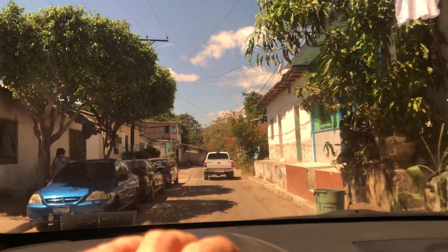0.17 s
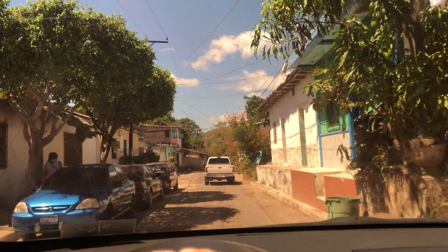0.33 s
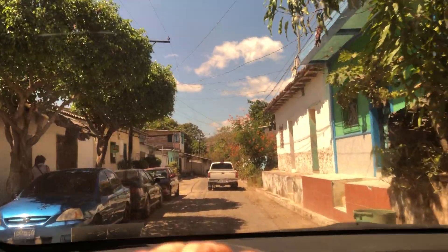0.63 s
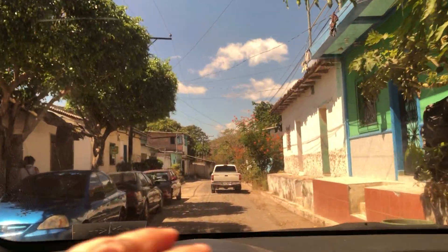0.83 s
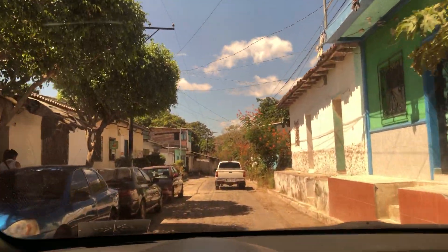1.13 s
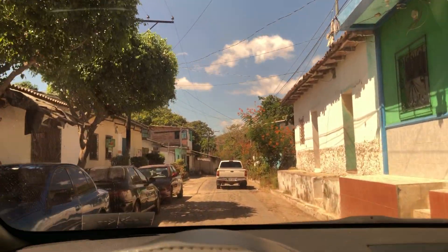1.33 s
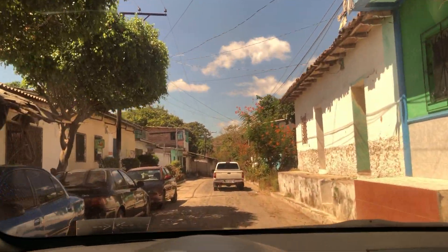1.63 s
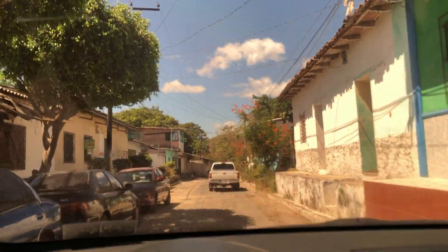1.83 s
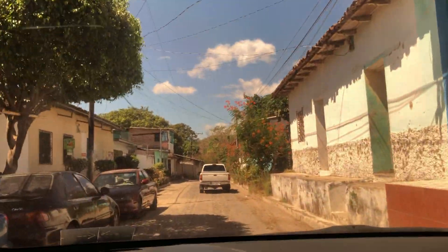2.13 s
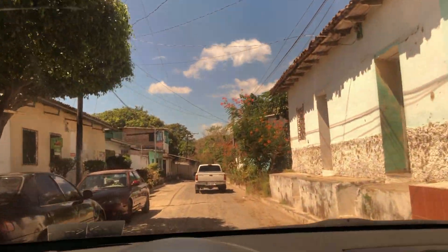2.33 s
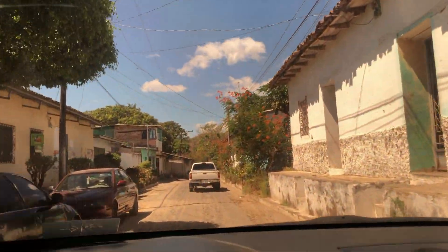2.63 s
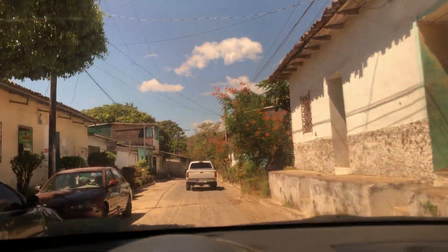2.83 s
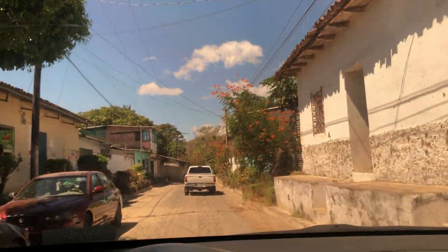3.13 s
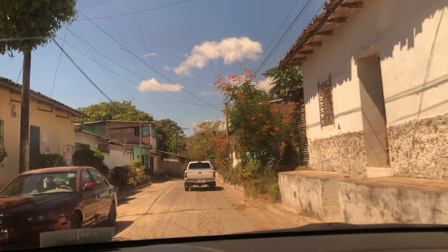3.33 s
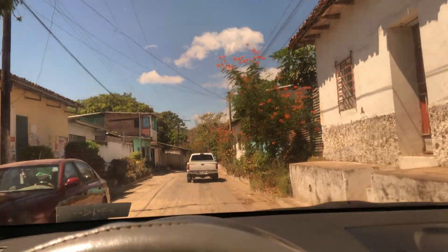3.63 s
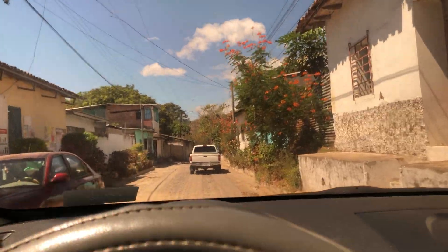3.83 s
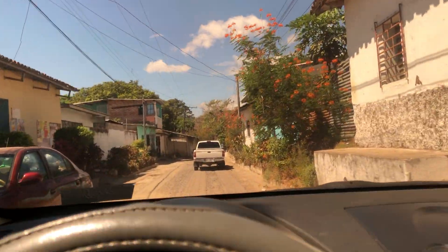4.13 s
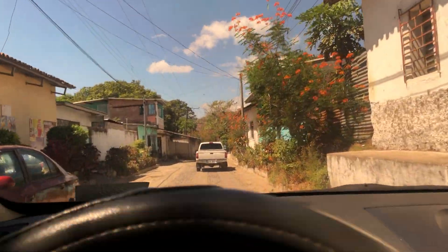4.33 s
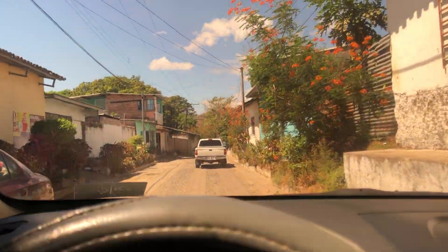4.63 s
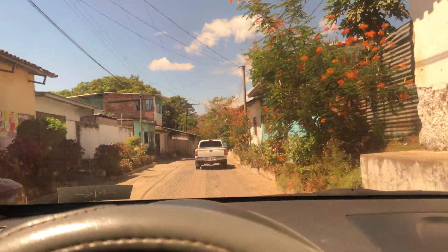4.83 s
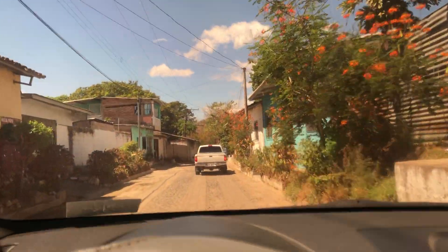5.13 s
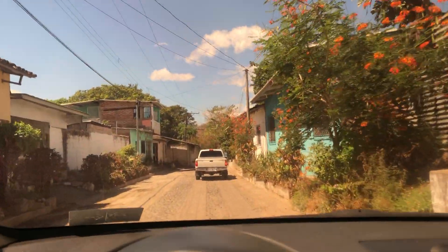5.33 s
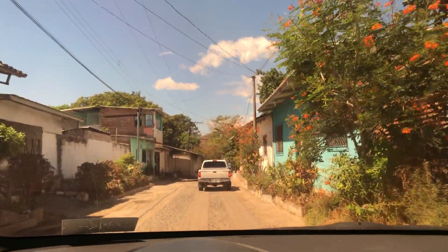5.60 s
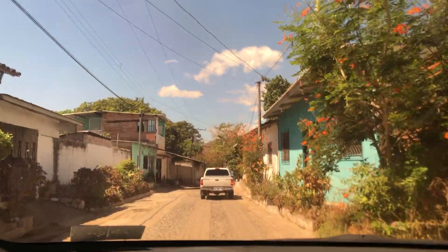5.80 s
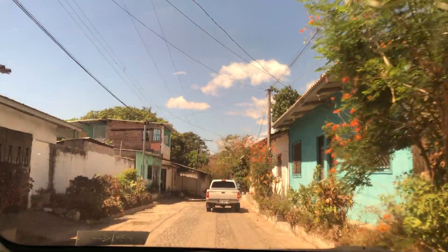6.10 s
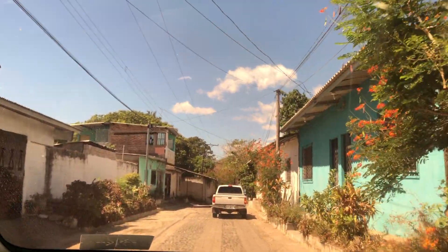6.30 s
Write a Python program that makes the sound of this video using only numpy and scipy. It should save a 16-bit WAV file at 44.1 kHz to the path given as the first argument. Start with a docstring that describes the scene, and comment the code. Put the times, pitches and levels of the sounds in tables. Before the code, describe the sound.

The cabin of a car rolling slowly over rough cobbles, heard from inside and already moving at the start. Throughout, a dominant deep rumble wavers and lurches, made of body shake, hollow cabin boom and dull floor drumming. Beneath it are muffled tyre roar, fine grit taps and a very faint airy hiss. From 0 to 0.7 s the ride is busiest, with tight thuds, rattling trim, bright ticks and a slight rustle. Knocks cluster again near 1.1 s and 1.9 s; heavier booms land around 2.2 to 2.4 s. About 3 to 3.5 s is calmer, with fewer rattles. Dry trim knocks gather at 3.8 to 3.95 s and 4.6 s. A crisp click and crinkle come near 5 s, a strong boom at 5.1 s, then lively rattling from 5.5 to 5.8 s and another thud near 5.6 s. Scattered knocks and ticks continue over the rumble until 6.4 s.

```python
"""Stones boom and shudder through the cabin of a car rolling slowly over cobbles, heard from inside at one microphone.
A random patter and single thuds ring the body, cabin air, tyre cavities and floor; shaped noise makes
the tyre roar, the air from the vents and the hiss above it, and grit taps under the tread.
Close by, loose trim knocks with ringing panel modes, bursts of noise click, and grainy treble rustles."""
import sys
import numpy as np
from scipy import signal
from scipy.fft import rfft, irfft, next_fast_len
from scipy.io import wavfile
from scipy.ndimage import uniform_filter1d, map_coordinates

SR = 44100
rng = np.random.default_rng(int(sys.argv[2]) if len(sys.argv) > 2 else 0)


def log_audio(samples):
    """Write samples as a 16-bit WAV file to the path given in sys.argv[1]."""
    # one column per channel
    frames = np.atleast_2d(samples).T
    # limit to full scale, then quantise
    limited = np.clip(frames, -1, 1)
    pcm = np.round(limited * 32767).astype(np.int16)
    wavfile.write(sys.argv[1], SR, pcm)


N = 284886  # length in samples

# Air noise along the road. Each row: time in seconds, tyre roar in dB, vent rush in dB, hiss in dB.
AIR_LEVELS = [(0.0, -42.5, -60.5, -63), (0.07, -52, -68, -69.5), (0.2, -47, -62.5, -65.5),
              (0.41, -46.5, -65.5, -67), (0.59, -49.5, -64.5, -65.5), (0.8, -50.5, -67, -67.5),
              (1.51, -52.5, -68.5, -70.5), (1.75, -51, -67.5, -69.5), (1.9, -47, -66, -64.5),
              (1.99, -52, -69.5, -72.5), (2.07, -48.5, -68.5, -68.5), (2.33, -50.5, -66, -67.5),
              (2.64, -49.5, -67.5, -69.5), (2.99, -50, -66, -67), (3.24, -51.5, -67, -70.5),
              (3.45, -50, -66, -67), (3.6, -51, -67, -69.5), (3.74, -50, -65.5, -69.5),
              (4.04, -51, -68, -70), (4.3, -50, -68, -68.5), (4.53, -49.5, -66.5, -69),
              (5.24, -51, -67.5, -69), (5.6, -50, -65, -67.5), (5.92, -50.5, -68, -70.5),
              (6.4, -50, -69.5, -71)]
# Resonances of the trim panels. Each row: pitch in Hz, relative level in dB.
PANEL_MODES = [(535, -1), (690, -1.5), (790, -5.5), (880, -3.5), (970, -5), (1090, -6), (1220, -7.5),
               (1430, -11.5), (1650, -9.5), (1790, -8), (1970, -21), (2300, -20), (2500, -19.5),
               (2850, -18), (3200, -20), (3480, -19.5), (3820, -18), (4200, -23), (4520, -26), (5700, -24),
               (6300, -29)]


def amp(db):
    """Decibels to gain."""
    return 10 ** (np.asarray(db) / 20)


def unit(x):
    """Scaled to rms 1."""
    return x / np.sqrt(np.mean(x ** 2) + 1e-20)


def curves(rows):
    """One value per sample for each column after the time."""
    s, *cols = np.transpose(rows)
    return [np.interp(np.arange(N) / SR, s, c) for c in cols]


def wobble(rate):
    """A smooth random curve, rate knots a second."""
    knots = rng.standard_normal(int(N * rate / SR) + 4)
    return map_coordinates(knots, [np.arange(N) * rate / SR])


def filtered(x, response):
    """x times a response of frequency, real or complex."""
    m = next_fast_len(len(x) + 8192)
    return irfft(rfft(x, m) * response(np.fft.rfftfreq(m, 1 / SR)), m)[:len(x)]


def modes(table):
    """Causal response of (Hz, width Hz, dB) resonances, neighbours in opposite phase."""
    def response(f):
        total = 0
        for k, (centre, width, db) in enumerate(table):
            damping = 1j * f * width
            total = total + (-1) ** k * amp(db) * damping / (centre * centre - f * f + damping)
        return total
    return response


def rush(spectrum, patchy_db):
    """Noise of rms 1 coloured by (Hz, dB per Hz) points, with random gain in patches of time and pitch."""
    z = signal.stft(rng.standard_normal(N + 512), nperseg=256)[2]
    field = uniform_filter1d(rng.standard_normal(z.shape), 6, 0)  # smooth across pitch
    field = uniform_filter1d(field, 8, 1)  # smooth across time
    x = signal.istft(z * amp(patchy_db * unit(field)), nperseg=256)[1][:N]
    hz, db = np.transpose(spectrum)
    return unit(filtered(x, lambda f: amp(np.interp(np.log(f + 1), np.log(hz), db, -120, -120))))


def steady(x, span):
    """x with its level evened out over span seconds."""
    power = uniform_filter1d(x ** 2, int(span * SR))
    return x / np.sqrt(np.abs(power) + 1e-9)


def taps(rows, sharp, snap):
    """Rows (s, peak dB, Hz, burst t60 s): dying noise rings a resonance of Q sharp, passed twice."""
    out, t = np.zeros(N + SR), np.arange(2048) / SR
    for s, db, hz, t60 in rows:
        onset = 1 - 0.56 * np.exp(-t / 0.0032)
        burst = rng.standard_normal(len(t)) * amp(-60 * t / t60) * onset
        burst[:3] += snap * np.array([1, 2, 1])  # the first contact
        peak = signal.iirpeak(hz, sharp, SR)
        ring = signal.lfilter(*peak, signal.lfilter(*peak, burst))
        out[round(s * SR):][:len(t)] += amp(db) * ring / np.abs(ring).max()
    return out[:N]


def scatter(count, top_db, spread_db, hz, octaves, t60):
    """Rows of random small taps: exponential drops below top_db, spread_db on average, hz +- octaves."""
    when, strength, pitch = rng.random((count, 3)).T
    level_db = top_db + spread_db * np.log(strength + 1e-9)
    pitch_hz = hz * 2 ** (octaves * (2 * pitch - 1))
    return np.c_[when * N / SR, level_db, pitch_hz, np.full(count, t60)]


def cobbles():
    """Random stone blows ring four parts of the car; a big stone swings one mode and quiets its part's patter."""
    # Patter of small stones before its random swings. Each row: time in seconds, body shake in dB,
    # cabin boom in dB, tyre cavity in dB, floor drumming in dB.
    patter_levels = [(0.0, -34, -30.5, -43.5, -46), (0.4, -30.5, -32, -41, -47.5),
                     (0.83, -37.5, -32, -42, -46), (1.64, -34.5, -33, -41.5, -50.5),
                     (2.05, -32.5, -31.5, -39.5, -49), (2.28, -36.5, -30.5, -41.5, -49),
                     (3.35, -35.5, -34, -44.5, -53), (3.72, -40, -36, -50.5, -48),
                     (4.06, -41, -34, -49.5, -55.5), (4.39, -35, -35, -41, -51.5),
                     (4.64, -38, -34, -45.5, -50), (5.24, -38, -32, -44, -50), (5.4, -36, -33, -42, -48),
                     (5.63, -33.5, -34.5, -48.5, -48), (6.08, -36.5, -35.5, -47, -50),
                     (6.46, -34.5, -32.5, -42, -51.5)]
    # Modes of body shake, cabin air, tyre air cavity and floor panel.
    # Each row: pitch in Hz, width in Hz, relative level in dB.
    body_modes = [(38.6, 4.4, -5.5), (46, 15, 0), (61.87, 48.6, -1.5)]
    cabin_modes = [(85.56, 22.8, -5), (113.7, 12.5, -1), (130.1, 19, 0), (149.07, 42.2, -8.5)]
    cavity_modes = [(170.4, 40.8, -3.5), (187.1, 28.7, 0), (208.4, 27, -7.5)]
    floor_modes = [(240.5, 63, 0.5), (308.3, 16.7, 3), (354, 29, 1), (440, 74, -16)]
    # Big stones under a wheel. Each row: middle in seconds, rms level at the middle in dB, thud pitch in Hz.
    big_stones = [(0.055, -37, 242), (0.056, -34, 161), (0.065, -39, 361), (0.12, -30, 115.7),
                  (0.17, -38, 44), (0.233, -24, 114.3), (0.267, -32.5, 180), (0.29, -35, 275),
                  (0.294, -34, 334), (0.324, -33, 92), (0.347, -36.5, 321), (0.389, -28, 61),
                  (0.405, -28.5, 171), (0.417, -34.5, 298), (0.484, -30.5, 192.4), (0.485, -29.5, 72),
                  (0.569, -39, 300), (0.683, -30.5, 121), (0.74, -28.5, 81), (0.878, -31.5, 181),
                  (0.899, -27.5, 107.6), (0.908, -37, 288), (0.863, -28, 70), (0.943, -47, 323),
                  (1.034, -31.5, 85.8), (1.043, -28, 124), (1.054, -37.5, 320), (1.083, -28, 181),
                  (1.107, -44, 248), (1.127, -29.5, 129), (1.168, -39.5, 345), (1.207, -41, 307),
                  (1.257, -28, 107.5), (1.322, -41, 253), (1.372, -41, 205), (1.392, -40, 334),
                  (1.393, -30.5, 54), (1.397, -27.5, 95), (1.506, -33, 188), (1.56, -38, 210),
                  (1.613, -33.5, 101), (1.648, -35.5, 181), (1.716, -33.5, 178), (1.742, -33.5, 44),
                  (1.806, -32.5, 178), (1.811, -33.5, 75), (1.846, -39, 385), (1.873, -26.5, 113.7),
                  (1.931, -29.5, 86), (1.936, -40, 312), (1.94, -26, 174), (1.999, -34.5, 168.8),
                  (2.055, -36, 210), (2.062, -25, 129), (2.11, -34, 178), (2.143, -38, 228),
                  (2.207, -27.5, 173), (2.211, -22.5, 96.5), (2.215, -43.5, 385), (2.251, -29.5, 55),
                  (2.26, -44, 291), (2.275, -26.5, 97), (2.359, -27.5, 75), (2.37, -35.5, 240),
                  (2.375, -40, 345), (2.372, -21.5, 120.1), (2.401, -37.5, 288), (2.459, -35, 39),
                  (2.532, -28.5, 112.8), (2.648, -26.5, 108.5), (2.71, -36, 68), (2.841, -28.5, 135.7),
                  (2.873, -28.5, 75), (2.966, -28, 142), (2.989, -40, 226), (3.048, -38, 205),
                  (3.053, -39, 39), (3.092, -30, 145), (3.153, -34, 43), (3.289, -42.5, 256),
                  (3.332, -39, 210), (3.401, -39, 323), (3.417, -38, 205), (3.527, -39.5, 291),
                  (3.575, -31, 45), (3.6, -29.5, 110.3), (3.662, -32.5, 65), (3.956, -34.5, 182),
                  (3.961, -43, 350), (4.04, -32.5, 124), (4.205, -28.5, 87), (4.23, -33, 44),
                  (4.42, -42, 291), (4.45, -31.5, 135.1), (4.455, -31.5, 175), (4.613, -28.5, 120),
                  (4.675, -27.5, 180), (4.863, -31.5, 54.4), (4.991, -29, 90.1), (5.11, -23.5, 121),
                  (5.162, -28, 136), (5.203, -37, 39), (5.249, -33, 170), (5.308, -45, 242),
                  (5.378, -30, 51.1), (5.418, -37, 204), (5.463, -31, 81), (5.5, -33, 40),
                  (5.527, -47, 301), (5.624, -36, 323), (5.635, -24, 114.3), (5.672, -43, 285),
                  (5.862, -42, 307), (5.867, -34, 178), (5.897, -30, 65.7), (5.99, -31.5, 129.5),
                  (6.041, -40.5, 366), (6.106, -40, 345), (6.151, -27, 127.2), (6.156, -32.5, 192),
                  (6.282, -43, 253)]
    # Brief let-ups of the patter. Each row: middle in seconds, depth from 0 to 1 (held to 0.95),
    # pitch in Hz that picks the nearest part to quiet.
    let_ups = [(0.131, 0.8, 190), (0.155, 0.4, 110), (0.684, 0.5, 50), (0.752, .7, 190), (1.009, 0.9, 190),
               (1.289, 0.9, 110), (1.474, 0.35, 110), (1.541, 0.8, 110), (1.748, 0.8, 109), (2.015, .6, 50),
               (2.027, 0.8, 110), (2.461, 0.8, 190), (2.593, 0.8, 110), (2.649, 0.5, 50), (2.708, .7, 190),
               (3.134, 0.4, 110), (3.338, 0.64, 110), (3.741, 0.6, 110), (3.768, 0.6, 190),
               (3.908, .7, 190), (3.982, .7, 50), (4.09, .7, 190), (4.096, 0.7, 110), (4.49, .6, 110),
               (4.621, 0.6, 50), (4.729, 0.3, 110), (4.873, 0.9, 110), (4.922, 0.6, 190), (5.048, 0.4, 50),
               (5.065, 0.6, 110), (5.491, .7, 190), (5.499, .7, 110), (5.584, 1, 110), (5.66, .7, 190),
               (5.721, 0.8, 50), (5.804, 1, 110), (6.022, 0.7, 110), (6.406, 0.9, 110)]
    bump_cycles, lull_cycles = 1.97, 1.57  # time from the middle to 1/e, in cycles of the row's pitch
    lurch_db, lurch_cycles = 2.5, 4.5  # random swings of the patter, cycles between knots

    t = np.arange(N) / SR
    parts = (body_modes, cabin_modes, cavity_modes, floor_modes)
    centres_hz = np.array([np.sqrt(table[0][0] * table[-1][0]) for table in parts])

    def nearest_part(hz):
        """Index of the part whose centre lies nearest in pitch."""
        return np.argmin(np.abs(np.log(hz / centres_hz)))

    thuds, unload = np.zeros(N), np.ones((len(parts), N))
    for (s, db, hz), turn in zip(big_stones, rng.random(len(big_stones))):
        near = slice(max(round((s - .15) * SR), 0), round((s + .15) * SR))
        swell = np.exp(-((t[near] - s) * hz / bump_cycles) ** 2)
        swing = np.sin(2 * np.pi * (hz * t[near] + turn))
        thuds[near] += np.sqrt(2) * amp(db) * swell * swing
        unload[nearest_part(hz), near] *= 1 - 0.41 * swell
    for s, depth, hz in let_ups:
        dip = np.exp(-((t - s) * hz / lull_cycles) ** 2)
        unload[nearest_part(hz)] *= 1 - min(depth, .95) * dip

    out = thuds
    for level_db, table, centre_hz, rest in zip(curves(patter_levels), parts, centres_hz, unload):
        blows = rng.standard_normal(N) * (rng.random(N) < 400 / SR)  # about 400 a second
        broad = modes([(centre_hz, 1.6 * table[0][0], 0)])  # steepens the skirts
        ring = filtered(blows, lambda f: modes(table)(f) * broad(f))
        even_s = 4 / table[0][0]  # springs and dampers even out the blows over a few cycles
        swing_db = lurch_db * wobble(centre_hz / lurch_cycles)
        out = out + rest * amp(level_db + swing_db) * steady(ring, even_s)
    return out


def tyres_and_vents():
    """Tyre roar, vent rush, hiss and topmost air: coloured noise whose levels share one random flutter."""
    # Colours of the noises. Each row: frequency in Hz, relative density in dB per Hz.
    roar_colour = [(240, -10), (400, 1), (490, -2.5), (580, -7), (720, -1), (915, 0.5), (1150, -5),
                   (1280, -4.5), (1740, -12), (2140, -21.5), (2300, -49), (2990, -71), (5060, -120)]
    vent_colour = [(1700, -33), (2180, -10), (2400, -0.5), (2560, 0.5), (2720, -6), (2900, -8.5),
                   (3800, -9.5), (4900, -18), (6000, -24)]
    hiss_colour = [(3800, -19), (5000, -7), (6300, -2.5), (7400, 0), (8700, -2), (10000, -6), (12000, -8),
                   (14000, -11), (15800, -19), (17000, -30)]
    top_colour = [(8500, -30), (10300, -9), (12000, -2), (13500, -8), (15800, -14), (17000, -30)]
    # The topmost air. Each row: time in seconds, level in dB before the 6.5 dB cut below.
    top_levels = [(0.05, -77), (0.3, -73), (0.54, -76), (1.5, -82), (2.17, -73), (2.28, -73), (2.42, -67),
                  (2.6, -78), (4.35, -81), (4.91, -76), (5.25, -76), (5.57, -75), (5.89, -78), (6.4, -77)]
    roar_db, vent_db, hiss_db = curves(AIR_LEVELS)
    top_db = curves(top_levels)[0] - 6.5
    jolt = wobble(23.11)
    roar = amp(roar_db + 0.13 * jolt + 0.11 * wobble(44)) * rush(roar_colour, patchy_db=1.37)
    vent = amp(vent_db + 0.51 * jolt + 0.16 * wobble(30)) * rush(vent_colour, patchy_db=1.65)
    hiss = amp(hiss_db + 0.54 * jolt + 0.56 * wobble(30)) * rush(hiss_colour, patchy_db=1.3)
    top = amp(top_db + 0.3 * jolt) * rush(top_colour, patchy_db=1.6)
    return roar + vent + hiss + top


def grit():
    """Clumps of small stones under the tread tap the panel modes, softened by the tyre rubber."""
    per_s, below_roar_db = 300, -7  # mean taps a second; level against the tyre roar
    clump_db, spread_db = 5.5, 5  # swing of the clumps; spread from tap to tap
    width = 0.074  # mode width as a share of its pitch
    rubber_hz = 1500  # the tyre softens grit above this

    size_db = clump_db * np.tanh(wobble(25)) + spread_db * np.clip(rng.standard_normal(N), -2, 2)
    size = amp(size_db) * np.sign(rng.standard_normal(N))
    blows = size * (rng.random(N) < per_s / SR)
    panel = modes([(hz, width * hz, db) for hz, db in PANEL_MODES])
    rubber = lambda f: (1 + 1j * f / rubber_hz) ** -3
    roar_db = curves(AIR_LEVELS)[0]
    return amp(roar_db + below_roar_db) * unit(filtered(blows, lambda f: panel(f) * rubber(f)))


def chatter():
    """Faint taps at random times run under the louder trim, one set midrange and one treble."""
    middle = scatter(count=400, top_db=-49.5, spread_db=12.0, hz=1074, octaves=0.73, t60=0.019)
    treble = scatter(count=150, top_db=-57.5, spread_db=15.0, hz=7950, octaves=0.61, t60=0.023)
    return taps(middle, sharp=2.3, snap=1.8) + taps(treble, sharp=2.8, snap=0.95)


def knocks():
    """Each blow on the trim starts a dry crack and rings panel modes near its centre; high modes die sooner."""
    # Trim knocks. Each row: start in seconds, nominal strength in dB, centre of the modes struck in Hz,
    # spread in octaves (at least 0.1 is used).
    blows = [(0.052, -30.5, 670, 0.17), (0.182, -36, 1060, 0.23), (0.243, -32.5, 1730, 1.2),
             (0.298, -36, 3200, 0.33), (0.319, -34.5, 1620, 1.2), (0.334, -38, 1100, 1),
             (0.367, -40, 3860, 0.2), (0.394, -38, 1430, 0.79), (0.424, -39, 3600, 0.35),
             (0.46, -33, 600, .37), (0.513, -39, 660, 0.17), (0.543, -39, 4500, .25),
             (0.572, -33.5, 1240, .9), (0.602, -36, 4500, .25), (0.62, -33, 1290, 0.44),
             (0.678, -35, 3800, .2), (0.855, -32.5, 960, 0.77), (0.87, -35, 730, 0.18),
             (1.03, -32, 2000, 0.15), (1.052, -37, 800, 0.26), (1.067, -36.5, 1500, 0.63),
             (1.0732, -28, 760, 0.38), (1.123, -40, 2000, 0.27), (1.127, -36, 1100, .25),
             (1.163, -41, 1500, 1), (1.197, -36, 1410, 0.73), (1.212, -35, 1100, 0.35),
             (1.258, -38, 1500, 0.32), (1.261, -31.5, 710, 0.35), (1.525, -38, 900, 0.22),
             (1.774, -42, 850, 0.28), (1.79, -35.5, 880, 0.55), (1.841, -41, 3700, .4),
             (1.888, -32.5, 3900, 0.17), (1.912, -34, 1700, 1.05), (1.916, -33.5, 1900, 0.28),
             (1.92, -35, 700, 0.37), (1.933, -37, 1000, 1), (1.942, -37, 4100, .25),
             (2.091, -32.5, 935, 0.24), (2.14, -39, 1500, 1), (2.21, -28.5, 790, 0.16),
             (2.234, -33.5, 1690, 0.6), (2.236, -30, 970, 0.16), (2.361, -32, 510, 0.14),
             (2.394, -36, 560, 0.24), (2.5, -43, 3700, .25), (2.517, -33, 2380, 0.17),
             (2.591, -31, 900, 0.22), (2.593, -44, 3600, .3), (2.611, -38, 3750, .25),
             (2.651, -38, 710, 0.19), (2.662, -42, 550, 0.24), (2.702, -42, 3600, .2),
             (2.762, -31, 1210, .2), (2.784, -41, 3800, .22), (2.79, -34.5, 1280, 1),
             (3.076, -34.5, 1600, 0.59), (3.079, -34, 1000, .2), (3.103, -41.5, 3100, .4),
             (3.415, -42, 3400, .25), (3.497, -37, 560, .2), (3.607, -32, 910, 0.32),
             (3.743, -35.5, 940, .15), (3.787, -34, 1120, 0.26), (3.8, -40, 3830, .1),
             (3.827, -32, 1000, 0.23), (3.828, -37, 2500, .35), (3.858, -36.5, 1720, 0.68),
             (3.896, -36.5, 900, 0.18), (3.937, -34, 700, 0.95), (3.945, -31, 500, 0.28),
             (3.953, -39, 3200, .2), (4.145, -35, 1410, 0.19), (4.222, -41, 3600, 0.35),
             (4.37, -40.5, 2200, 1.4), (4.401, -39.5, 1640, 1.34), (4.401, -37, 1080, .2),
             (4.477, -37, 915, 0.12), (4.576, -31.5, 1430, 0.3), (4.576, -33, 940, 0.27),
             (4.576, -39, 2700, 0.46), (4.594, -42, 3480, .12), (4.598, -32, 560, 0.17),
             (4.604, -36, 1640, 0.11), (4.612, -31, 530, 0.14), (5.098, -38, 560, 0.25),
             (5.123, -33.5, 1130, 0.34), (5.172, -33.5, 685, 0.092), (5.232, -32, 1110, 0.3),
             (5.341, -33, 2300, .1), (5.359, -34, 740, 0.14), (5.426, -39, 850, 0.13),
             (5.462, -41, 880, 0.17), (5.508, -31, 1790, 0.15), (5.51, -35, 3000, .45),
             (5.512, -29, 910, 0.15), (5.535, -40, 1650, .15), (5.536, -38, 800, 0.18),
             (5.562, -33.5, 880, 0.15), (5.576, -35, 1700, 0.27), (5.579, -34, 900, 0.16),
             (5.612, -35, 800, 0.18), (5.627, -41, 1790, 0.11), (5.638, -34, 2960, 0.36),
             (5.694, -34, 2600, 0.3), (5.759, -38, 2800, 0.25), (5.76, -32.5, 1790, .15),
             (5.762, -33, 980, .15), (5.877, -40, 900, 0.18), (5.954, -31.5, 1170, 0.35),
             (6.005, -39, 1800, 0.27), (6.368, -39, 720, 0.14), (6.229, -39, 2000, 0.6),
             (6.379, -39, 3000, 0.4), (6.381, -32, 4200, .12), (6.417, -37, 1000, 2.3),
             (6.419, -37, 1790, .12)]
    ring_t60_s = 0.036  # for a 1000 Hz mode and a spread of 0.4 octaves
    rise_cycles = 1.4  # build-up time in cycles of the centre, for a spread of 0.4 octaves
    crisp = 0.075  # blows that strike many modes are harder: they rise and die sooner
    crack_db, crack_t60_s = -4.5, 0.026  # noise that drives the crack, against the centre mode

    out, t = np.zeros(N + SR), np.arange(4096) / SR
    hz, mode_db = np.transpose(PANEL_MODES)[:, :, None]
    for s, db, centre_hz, spread in blows:
        vary_level, vary_pitch, vary_phase = rng.standard_normal((3, len(hz), 1))
        spread = max(spread, .1)
        soft = (0.4 / spread) ** crisp
        off = (np.log2(hz / centre_hz) / spread) ** 2
        level_db = db - 0.5 + mode_db - 4 * (off - off.min()) + 1.4 * vary_level
        fade_db = -60 * t / (ring_t60_s * soft * (1000 / hz) ** 0.24)
        phase = 2 * np.pi * hz * (1 + 0.014 * vary_pitch) * t + 0.83 * vary_phase
        ring = (amp(level_db + fade_db) * np.sin(phase)).sum(0)
        # the loose panel buzzes: slight random roughness of the ring
        buzz = 1 + 0.057 * unit(uniform_filter1d(rng.standard_normal(len(t)), size=40))
        rise = 1 - np.exp(-t * centre_hz / rise_cycles / soft ** 2)
        centre_db = np.interp(centre_hz, hz[:, 0], mode_db[:, 0])
        crack_fade = amp(db + crack_db + centre_db - 60 * t / crack_t60_s)
        crack_noise = signal.lfilter(*signal.iirpeak(centre_hz, 1, SR), rng.standard_normal(len(t)))
        out[round(s * SR):][:len(t)] += crack_fade * crack_noise + ring * buzz * rise
    return out[:N]


def rustles():
    """Something thin crinkles: a grainy puff of treble that swells and fades."""
    # Brief rustles. Each row: middle in seconds, level at the middle in dB,
    # time from the middle to 1/e in seconds, pitch in Hz.
    puffs = [(0.184, -61, 0.031, 7500), (0.305, -64.5, 0.094, 7500), (0.744, -61, 0.013, 11000),
             (4.944, -61, 0.009, 8000), (4.995, -52, 0.013, 7800), (6.125, -57, 0.011, 9900)]
    out, t = 0, np.arange(N) / SR
    for s, db, half, hz in puffs:
        grain = rng.standard_normal(N) * amp(2.7 * wobble(900))
        resonance = modes([(hz, 1.1 * hz, 0)])
        low_cut = lambda f: 1 / (1 + (5200 / (f + 1)) ** 6)
        high_cut = lambda f: 1 / (1 + (f / 13000) ** 4)
        treble = filtered(grain, lambda f: resonance(f) ** 2 * low_cut(f) * high_cut(f))
        swell = np.exp(-np.abs((t - s) / half) ** 1.04)
        out = out + amp(db) * swell * unit(treble)
    return out


def clicks():
    """Trim clips click: short noise bursts through a broad resonance, the higher ones dying sooner."""
    # Bright clicks. Each row: start in seconds, peak level in dB, pitch in Hz.
    bright = [(0.1984, -60, 11000), (0.245, -46, 7460), (0.2952, -48, 6200), (0.319, -57, 6500),
              (0.367, -47, 6500), (0.4164, -53, 8410), (0.545, -54, 5000), (0.5766, -51, 12300),
              (0.625, -44, 8440), (0.7203, -50, 11400), (0.78, -51, 8500), (0.8104, -60, 9300),
              (0.9684, -63, 12100), (1.165, -51.5, 7650), (1.196, -57, 4500), (1.21, -56, 9000),
              (1.7534, -48, 11400), (1.8875, -51, 8060), (2.093, -57, 8000), (2.094, -62, 13500),
              (2.1605, -51, 7610), (2.203, -58, 7000), (2.2236, -55, 7900), (2.286, -60, 7000),
              (2.384, -64, 8000), (2.594, -58, 8000), (2.7482, -59, 14000), (2.8534, -50.5, 8200),
              (3.025, -52, 7500), (3.0252, -51, 12500), (3.397, -59, 13000), (3.418, -56, 7700),
              (3.6634, -59, 11000), (4.2223, -55, 7800), (4.272, -54, 6470), (4.369, -59, 5500),
              (4.4014, -57, 7710), (4.4725, -56, 7920), (4.779, -58, 13500), (4.8733, -51, 10500),
              (4.936, -48, 8290), (4.951, -50, 7500), (4.976, -54, 8500), (4.991, -42, 10500),
              (5.231, -55, 6000), (5.4051, -55, 7740), (5.512, -48, 8200), (5.6376, -52, 8360),
              (5.657, -60, 13000), (5.6935, -53, 7890), (5.719, -55, 7730), (5.9546, -56, 5800),
              (6.12, -51, 8000), (6.3802, -51, 8400)]
    t60_s, shortens = 0.039, 0.99  # burst decay at 8000 Hz; how steeply it shortens with pitch
    rows = [(s, db, hz, t60_s * (8000 / hz) ** shortens) for s, db, hz in bright]
    return taps(rows, sharp=1.35, snap=1.0)


def scene():
    """All sources at the one microphone."""
    road = cobbles() + tyres_and_vents() + grit()
    trim = chatter() + knocks() + rustles() + clicks()
    return (road + trim)[None]


def record(dry):
    """The phone thins the lowest bass and keeps nothing above its band limit."""
    bass_cut_hz, top_hz = 9, 15770
    return filtered(dry[0], lambda hz: (hz < top_hz) / (1 + (bass_cut_hz / (hz + 1)) ** 4))[None]


dry = scene()
out = record(dry)
log_audio(out)
```